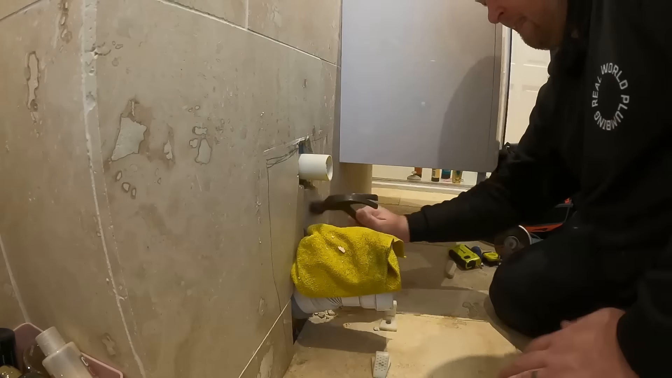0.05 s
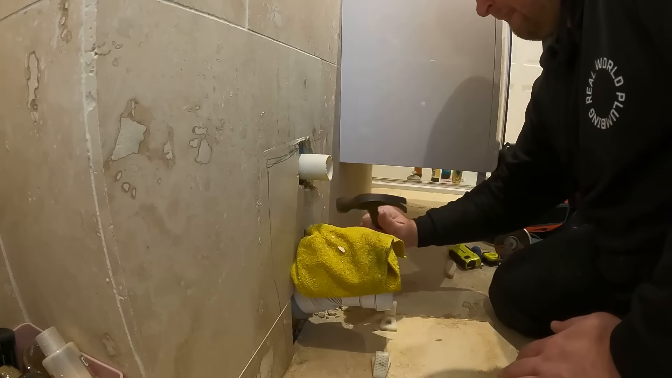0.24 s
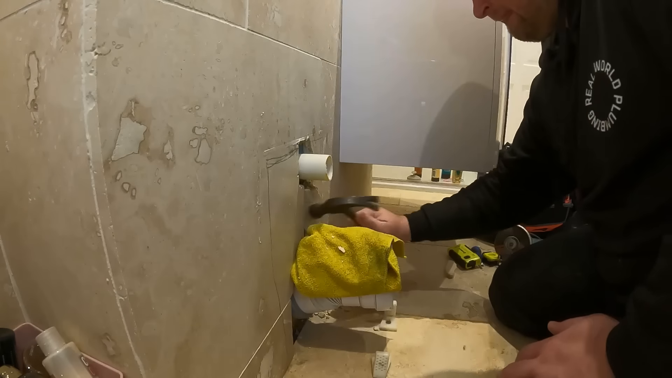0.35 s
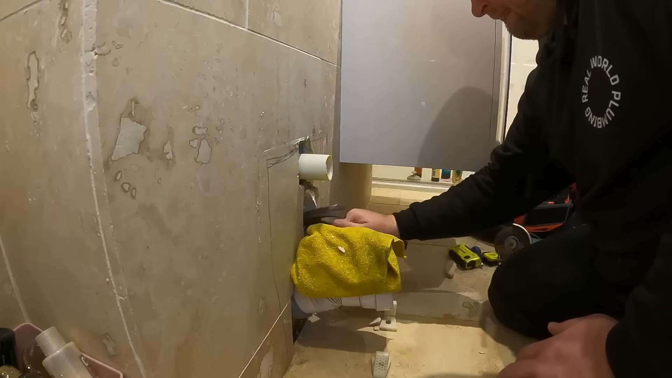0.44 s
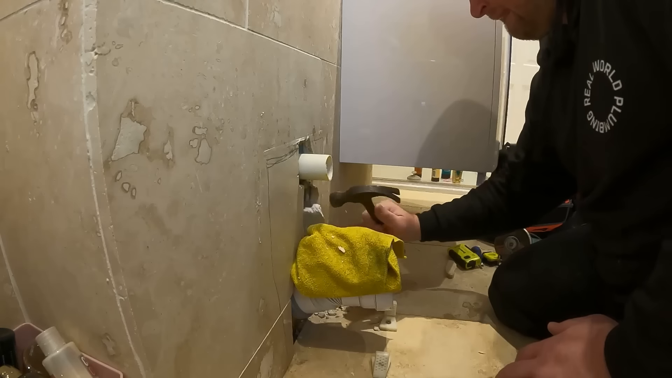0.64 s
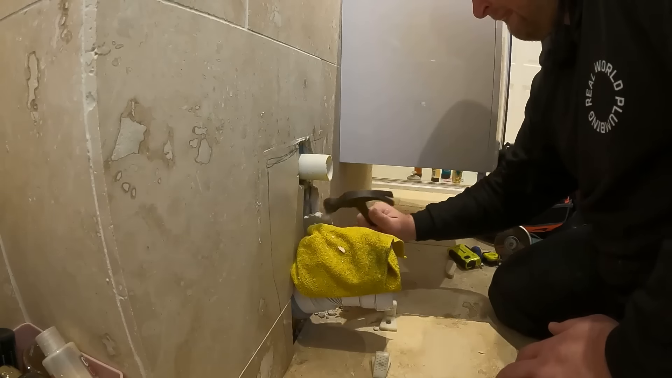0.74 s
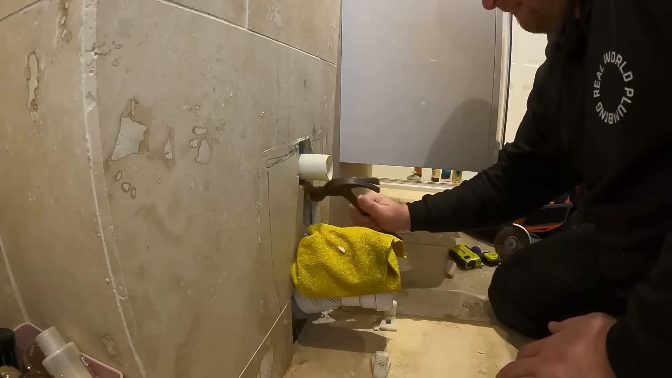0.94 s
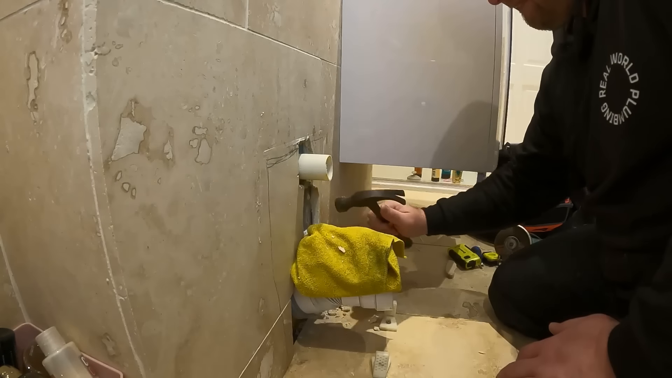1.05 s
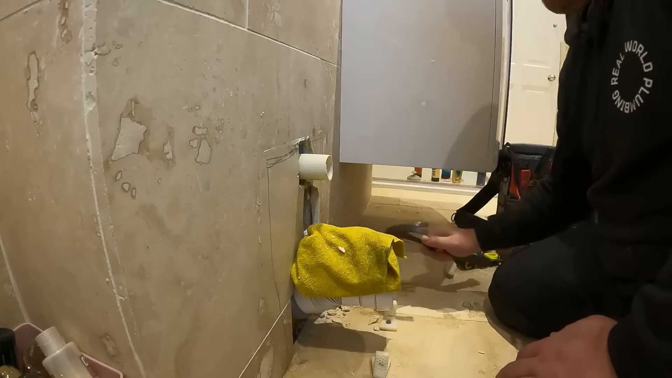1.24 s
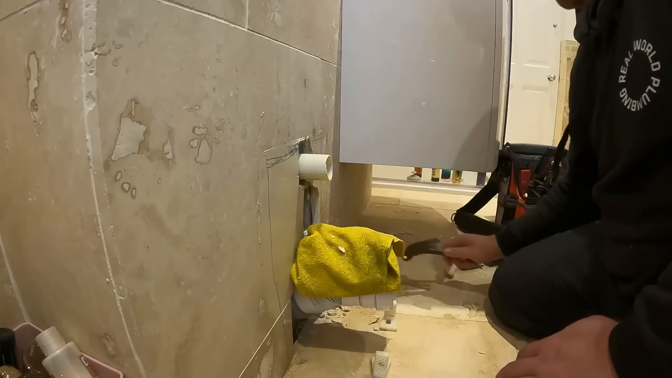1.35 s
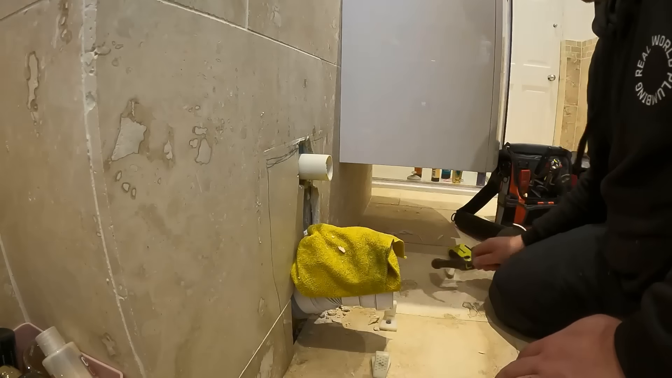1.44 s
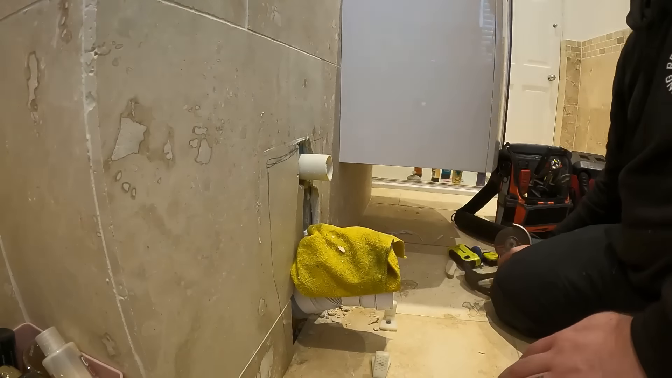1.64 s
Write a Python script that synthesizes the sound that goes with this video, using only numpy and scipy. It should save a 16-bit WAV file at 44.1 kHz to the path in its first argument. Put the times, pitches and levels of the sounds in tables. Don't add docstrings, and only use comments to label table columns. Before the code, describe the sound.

Hammer cracking ceramic wall tiles, two hard sharp blows then weaker knocks, in an echoing bathroom

```python
import sys
import numpy as np
from scipy import signal
from scipy.fft import rfft, irfft
from scipy.io import wavfile
from scipy.ndimage import uniform_filter1d

SR = 44100
rng = np.random.default_rng(int(sys.argv[2]) if len(sys.argv) > 2 else 0)


def how_loud(loudness_db):
    steps = np.asarray(loudness_db, float) / 20
    return 10 ** steps


def unload_wav(signal):
    wavfile.write(
        sys.argv[1],
        SR,
        np.round(np.clip(np.atleast_2d(signal).T, -1, 1) * 32767).astype(np.int16),
    )


N = 74970
LEAD_S = 0.6

# boom_db, body_db, bright_db
BLOWS = [
    (-.35, -44, -13, -16, -18),
    (0.1854, -28, -31, -21.5, -31),
    (0.209, -34, -35, -19, -19),
    (0.2185, 11.5, -3.5, -1.5, -1.5),
    (.5092, 11.5, -17.5, -11, -3.5),
    (0.905, -10.5, -24.5, -16, -38),
    (.990, -33.5, -41, -33, -33.5),
    (1.0645, -4.5, -24.5, -10, -28.5),
]
# pitch_hz, level_db, fade_60db_s
WHOLE_TILE = [(902, -14, 0.077), (1251, -6.5, 0.042), (1798, -8, 0.046), (2750, -6, 0.026),
              (3200, -9, 0.03), (3400, -8.5, 0.029), (5030, 0, 0.017), (5160, -8, 0.022),
              (8600, -21, 0.0092), (9900, -59, 0.024)]
# pitch_hz, level_db, fade_60db_s
CRACKED_TILE = [(932, 5.5, 0.016), (2050, 8.5, 0.012), (2317, 4, 0.016), (3200, 11.5, 0.01),
                (3757, 3, .025), (4970, -5, 0.016), (5550, 0, 0.031), (5860, -0.5, 0.02), (6390, -6, 0.022),
                (7100, -23, .015), (12300, -35, .004)]
# pitch_hz, level_db, fade_60db_s
LOOSE_SLAB = [(745, -4, .059), (957, 6, 0.03), (1440, -3, .02), (1810, -.5, 0.036), (2414, -2.5, 0.031),
              (2760, -14, 0.019), (3780, -19, .016), (4070, -8.5, 0.022), (4590, -10, .016),
              (6360, -25, 0.018)]
# pitch_hz, level_db, fade_60db_s
BROKEN_PIECE = [(620, 2.5, .03), (1057, 3.5, .045), (1390, -1, 0.04), (1756, 1.5, 0.022), (2260, 3, .018),
                (2470, -6, .016), (2930, -9, .016), (3620, -11, .014), (4180, -13, .016), (5400, -13, .016)]
LANDS_ON = [LOOSE_SLAB, LOOSE_SLAB, BROKEN_PIECE, WHOLE_TILE,
            CRACKED_TILE, BROKEN_PIECE, LOOSE_SLAB, LOOSE_SLAB]
CRACK_NOISE_DB = [-8, 14, 19, -14, -17, -4, 17, -11.5]
CRACK_TOP_HZ = [2500, 2000, 3000, 6000, 5850, 3420, 2500, 3480]
CRACK_TO_ROOM_DB = [-11, -16, -12, -12.5, -11.5, -14, -10, -15.5]
# peak_hz, width_hz, peak_db, top_hz
SPOTS = [(500, 300, -2.5, 12000), (330, 200, 3, 12000), (3000, 800, 10, 12000), (4960, 340, 6, 5240),
         (5580, 500, 4, 8800), (1300, 800, -0.5, 12000), (1500, 800, -4, 12000), (780, 260, 2, 9000)]
CRACK_FADE_S, TOUCH_S = 0.0049, 0.00036
PHASE_SCATTER = 0.25
BOOM_HZ, BRIGHT_HZ = 298, 1150

# start_s, level_db, fade_factor, tilt_db_per_octave
BOOMS = [(-.3, -24, 1.45, 9), (.186, -22, 0.49, 10), (0.207, -8, 0.76, -7.5), (0.2198, -2.5, 0.99, -2.5),
         (0.273, -2, 0.76, -4), (0.5085, 1, 0.52, 5), (.7, -39, 1.7, -11.5), (0.9068, -32, 0.29, 4),
         (0.917, -23.5, 0.96, -0.5), (0.956, -29.5, 2.1, -3), (0.999, -30, 0.32, 11.5),
         (1.069, -20, 1.02, 3)]
# pitch_hz, level_db, fade_60db_s
LOW_MODES = [(71.2, -13.5, 0.45), (101.6, -5.5, 0.39), (117.83, -8.5, 0.58), (145.4, 7.5, 0.23),
             (167, -10, 0.81), (234.3, -8.5, 0.48), (265.3, -7.5, 0.55), (322.7, -8.5, 0.24),
             (407, -12.5, 0.48), (501.7, -20, 0.54), (787, -20, 0.43)]
BOOM_RISE_S, BOOM_SCATTER_DB = 0.016, 4.5

# start_s, level_db, pitch_hz, fade_60db_s
PANELS = [(.915, -24, 148, 0.62), (.6, -26.5, 760, 0.94), (.525, -21.5, 400, 0.28), (.06, -52.5, 320, 0.74),
          (0.1, -53, 540, .4), (0.039, -51.5, 230, 0.86), (0.22, -6, 234, 0.44), (0.52, -15, 235, 0.22),
          (.55, -16, 803, 0.53), (.62, -26.5, 495, 0.99), (.72, -32.5, 234, 0.92),
          (1.067, -28.5, 256, 0.19), (1.12, -25, 512.5, 0.52), (.2, -33, 5000, 0.22), (0.18, -22, 327, 0.2),
          (1.379, -33, 496, 0.11), (1.528, -40.5, 500, 0.094)]
PANEL_RISE_S, PANEL_WOBBLE = 0.0065, 9.14

# start_s, level_db, pitch_hz, ring_s, width_hz
SHARDS = [(0.16, -43, 2600, 0.0065, 2000), (.1915, -23.5, 1900, 0.0094, 4300),
          (0.37, -32, 9200, 0.004, 3000), (0.437, 3, 3440, 0.0059, 3400), (0.999, -19, 1700, 0.011, 2000),
          (0.837, -46, 10000, 0.0099, 3950), (.965, -43.5, 7100, 0.033, 500), (0.76, -48, 6700, .02, 500),
          (1.0337, -16, 2600, 0.0039, 3500), (1.1045, -22, 4150, 0.0067, 2000),
          (1.27, -27, 3500, 0.013, 3900), (1.2715, -43, 9000, 0.0087, 7800), (1, -30.5, 3400, .005, 2300),
          (1.28, -38, 7070, .012, 1000), (1.5, -27.5, 3060, 0.0049, 3100), (1.2, -40, 5500, 0.0091, 2700),
          (0.8, -43.5, 9800, 0.017, 2200), (1.4945, -29.5, 3900, 0.0055, 2000),
          (1.4955, -42.5, 9720, 0.0045, 4700), (1.511, -33, 6700, 0.0024, 2000),
          (.1925, -36.5, 7800, 0.0071, 1200), (.203, -49, 8700, 0.031, 500),
          (1.0652, -18.5, 3700, 0.0092, 2900), (0.91, -25, 3900, .005, 1200),
          (1.0675, -12.5, 1400, 0.0084, 1800), (1.072, -17, 980, 0.011, 760),
          (.9078, -15, 1000, 0.0068, 1500), (0.42, -9, 3000, 0.0071, 1500)]
SHARD_SKIRT = 1.4
CHIPS_TO_ROOM_DB = -6.5
# start_s, level_db, pitch_hz, fade_60db_s
TICKS = [(1.0665, -19.5, 745, 0.04), (1.0664, -17, 965, 0.033), (1.0655, -37, 4860, .012),
         (0.907, -31, 1393, 0.039), (0.9051, -30, 2240, 0.017), (1.341, -46, 2070, 0.027),
         (1.341, -41, 2740, .02), (1.34, -44, 3700, .02), (1.27, -39, 2500, .02), (1.5758, -42, 3120, .012),
         (1.585, -33, 3200, 0.01), (1.595, -40, 3230, 0.02), (1.602, -40.5, 3270, 0.015),
         (1.6013, -45, 1970, 0.011), (1.6098, -44, 3260, 0.017), (1.621, -47, 3100, .01),
         (1.626, -45, 3000, .01), (1.659, -44, 3000, .014), (1.665, -47.5, 1680, .04),
         (1.6845, -42, 2800, .01), (1.6885, -48, 2900, .025)]
TICK_RISE_S = 0.00066

# time_s, level_db
GRIT = [(.38, -105), (.42, -48), (.6, -49.5), (.75, -72), (.9, -66), (1.1, -65), (1.26, -98), (1.275, -55),
        (1.36, -78)]
GRIT_HZ, GRIT_WIDTH_HZ, GRIT_SCATTER_DB = 8200, 4600, 1.8
# time_s, level_db
SCRAPE = [(1.52, -100), (1.56, -64), (1.6, -55.5), (1.65, -51), (1.7, -49)]
# pitch_hz, width_hz, level_db
SCRAPED_SURFACE = [(1700, 300, -17), (2740, 830, -8), (4280, 1100, -15), (6000, 2500, -21.5)]
RUB_DB = 4.5

# pitch_hz, level_db
ROOM_COLOUR = [(24, -64), (40, -16), (147, 16.5), (283, 4), (503, -4), (990, -1), (3220, -6.5), (5580, -17),
               (16000, -53)]
# pitch_hz, width_hz, level_db
ROOM_BUMPS = [(503, 139, 6.5), (827, 49, 2.5), (1530, 130, 4), (3200, 1070, 1.5), (4400, 520, -2.5),
              (5220, 1750, 6), (11800, 990, -8)]
# pitch_hz, fade_60db_s
ROOM_FADE = [(60, 0.75), (200, 0.57), (400, 1), (800, 0.88), (2000, 0.82), (5000, 0.94), (10000, 1)]
ROOM_RISE_S = 0.0023

# pitch_hz, level_db
AIR = [(21, -50), (40, -22), (85, -11), (160, -7), (490, -21), (650, -10), (3440, -16.5), (10100, -36),
       (16000, -63)]
AIR_DB = -55

NOTCH_HZ, NOTCH_WIDTH_HZ, NOTCH_DB = 9040, 260, -20
PORT_HZ, PORT_WIDTH_HZ, PORT_DB = 9500, 340, 7
TOP_DB, SENSE_S, GRAB_S, RECOVER_DB_S = -15, 0.0076, 0.0026, 77.5
OVERLOAD = 0.9
MIC_LOW_HZ, MIC_TOP_HZ = 59, 11500


def unit(x):
    return x / np.sqrt(np.mean(x ** 2))


def shape(x, gain):
    f = np.arange(len(x) // 2 + 1) * SR / len(x) + 1
    return irfft(rfft(x) * gain(f), len(x))


def line(table, at, log=False):
    a, b = np.array(table).T
    return np.interp(np.log(at), np.log(a), b) if log else np.interp(at, a, b)


def bell(f, hz, width_hz):
    return 1 / (1 + ((f - hz) * 2 / width_hz) ** 2)


def fade(t, t60):
    return 1000. ** (-t / t60)


def rise(t, rise_s):
    return 1 - np.exp(-t / rise_s)


def ring(modes, t, phase):
    return sum(how_loud(db) * np.sin(2 * np.pi * hz * t + p) * fade(t, t60)
               for (hz, db, t60), p in zip(modes, phase))


def add(track, s, x):
    i = int((s + LEAD_S) * SR)
    track[i:i + len(x)] += x[:len(track) - i]


def low_part(f, hz):
    return 1 / (1 + (f / hz) ** 2)


def blows(size):
    t = np.arange(2048) / SR
    near, wet = np.zeros(size), np.zeros(size)
    for blow, modes, noise_db, top_hz, room_db, spot in zip(
            BLOWS, LANDS_ON, CRACK_NOISE_DB, CRACK_TOP_HZ, CRACK_TO_ROOM_DB, SPOTS):
        s, db, boom_db, body_db, bright_db = blow
        peak_hz, width_hz, peak_db, tail_top_hz = spot

        phase = np.pi * (1 + PHASE_SCATTER * rng.uniform(-1.42, 1, size=14))
        tile = ring(modes, t, phase)
        limit = signal.butter(3, top_hz, fs=SR, output="sos")
        crack = signal.sosfilt(limit, rng.standard_normal(len(t))) * np.exp(-t / CRACK_FADE_S)
        hit = tile / np.abs(tile).max() + how_loud(noise_db) * crack
        hit = how_loud(db) * hit * rise(t, TOUCH_S) ** 2

        def spot_colour(f):
            return how_loud(peak_db * bell(f, peak_hz, width_hz)) / np.sqrt(1 + (f / tail_top_hz) ** 4)

        def push(f):
            boom, below_bright = low_part(f, BOOM_HZ), low_part(f, BRIGHT_HZ)
            body = below_bright - boom
            return how_loud(boom_db) * boom + how_loud(body_db) * body + how_loud(bright_db) * (1 - below_bright)

        tail = shape(room(size), spot_colour)
        add(near, s, hit)
        pushed_room = how_loud(30.5) * shape(tail, push)
        crack_echo = how_loud(room_db) * signal.fftconvolve(tail, hit)[:size]
        add(wet, s, pushed_room + crack_echo)
    return near, wet


def booms(size):
    t, out = np.arange(SR) / SR, np.zeros(size)
    for s, db, fade_factor, tilt_db in BOOMS:
        luck = rng.uniform(-1.11, 1, (len(LOW_MODES), 2))
        modes = []
        for (hz, mode_db, t60), chance in zip(LOW_MODES, luck[:, 0]):
            mode_db = mode_db + tilt_db * np.log2(hz / 150) + BOOM_SCATTER_DB * chance
            modes.append((hz, mode_db, t60 * fade_factor))
        hum = ring(modes, t, np.pi * luck[:, 1])
        add(out, s, how_loud(db) * hum * rise(t, BOOM_RISE_S) / 2)
    return out


def panels(size):
    t, out = np.arange(SR // 2) / SR, np.zeros(size)
    for s, db, hz, t60 in PANELS:
        drift = uniform_filter1d(rng.standard_normal(len(t)), size=400)
        wobble = PANEL_WOBBLE * np.cumsum(drift) * hz / SR
        hum = np.sin(2 * np.pi * hz * t + wobble)
        add(out, s, how_loud(db) * hum * fade(t, t60) * rise(t, PANEL_RISE_S))
    return out


def shards(size):
    t, out = np.arange(2048) / SR, np.zeros(size)
    for s, db, hz, ring_s, width_hz in SHARDS:
        burst = shape(rng.standard_normal(len(t)), lambda f: bell(f, hz, width_hz) ** SHARD_SKIRT)
        add(out, s, how_loud(db) * unit(burst) * fade(t, 2 * ring_s) * rise(t, TOUCH_S) / 2)
    return out


def ticks(size):
    t, out = np.arange(2048) / SR, np.zeros(size)
    soft_start = 1 - np.exp(-(t / TICK_RISE_S) ** 2)
    for s, db, hz, t60 in TICKS:
        add(out, s, ring([(hz, db, t60)], t, [0]) * soft_start * 2)
    return out


def grit(t):
    unevenness = how_loud(GRIT_SCATTER_DB * rng.exponential(size=len(t)))
    dust = rng.standard_normal(len(t)) * unevenness
    hiss = unit(shape(dust, lambda f: bell(f, GRIT_HZ, GRIT_WIDTH_HZ)))
    return hiss * how_loud(line(GRIT, t))


def scrape(t):
    grip = unit(uniform_filter1d(rng.standard_normal(len(t)), size=200))
    rub = rng.standard_normal(len(t)) * how_loud(RUB_DB * np.tanh(grip))

    def surface(f):
        return sum(how_loud(db) * bell(f, hz, w) for hz, w, db in SCRAPED_SURFACE)

    return unit(shape(rub, surface)) * how_loud(line(SCRAPE, t))


def room(size):
    t, tail = np.arange(size) / SR, 0

    def colour(f):
        bumps_db = sum(db * bell(f, hz, w) for hz, w, db in ROOM_BUMPS)
        return how_loud(line(ROOM_COLOUR, f, True) + bumps_db)

    noise = shape(rng.standard_normal(size), colour)
    for hz in 44 * 2. ** np.arange(9):
        band = shape(noise, lambda f: np.cos(np.pi / 2 * np.clip(np.log2(f / hz), -1, 1)) ** 2)
        tail = tail + band * fade(t, line(ROOM_FADE, hz, True))
    return unit(tail) * rise(t, ROOM_RISE_S) / np.sqrt(size)


def still_air(size):
    noise = rng.standard_normal(size)
    return unit(shape(noise, lambda f: how_loud(line(AIR, f, True)))) * how_loud(AIR_DB)


def scene():
    size = N + int(LEAD_S * SR)
    t = np.arange(size) / SR - LEAD_S
    near, wet = blows(size)
    hums = booms(size) + panels(size)
    chips = shards(size) + ticks(size)
    chip_echo = how_loud(CHIPS_TO_ROOM_DB) * signal.fftconvolve(chips, room(size))[:size]
    mix = near + wet + hums + chips + chip_echo + grit(t) + scrape(t) + still_air(size)
    return mix[None, -N:]


def lag(v, s):
    keep = np.exp(-1 / (s * SR))
    return signal.lfilter([1 - keep], [1, -keep], v)


def automatic_level(x):
    ramp = RECOVER_DB_S * np.arange(N) / SR
    level_db = 10 * np.log10(lag(x ** 2, SENSE_S) + 1e-12)
    held_db = np.maximum.accumulate(level_db + ramp) - ramp
    too_loud_db = np.maximum(held_db - TOP_DB, 0)
    return x * how_loud(-lag(lag(too_loud_db, GRAB_S / 2), GRAB_S / 2))


def low_pass(x):
    return signal.sosfilt(signal.butter(12, 16260, fs=SR, output="sos"), x)


def record(dry):
    def housing(f):
        notch_db = NOTCH_DB * bell(f, NOTCH_HZ, NOTCH_WIDTH_HZ)
        return how_loud(notch_db + PORT_DB * bell(f, PORT_HZ, PORT_WIDTH_HZ))

    x = automatic_level(shape(dry[0], housing))
    x = x / (1 + (x / OVERLOAD) ** 4) ** (1 / 4)
    limits = signal.butter(2, [MIC_LOW_HZ, MIC_TOP_HZ], "band", fs=SR, output="sos")
    x = signal.sosfilt(limits, x)
    return low_pass(np.clip(x, -1, 1)[None])


dry = scene()
out = record(dry)
unload_wav(out)
```